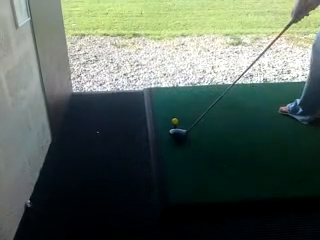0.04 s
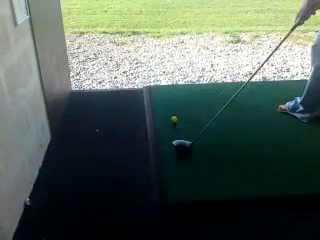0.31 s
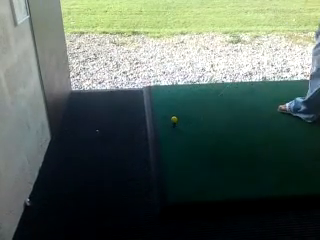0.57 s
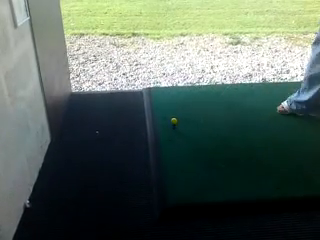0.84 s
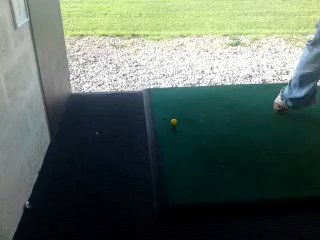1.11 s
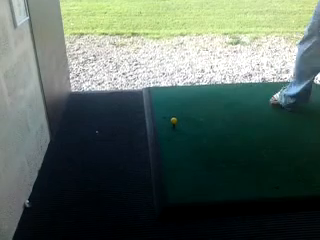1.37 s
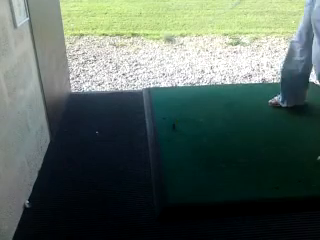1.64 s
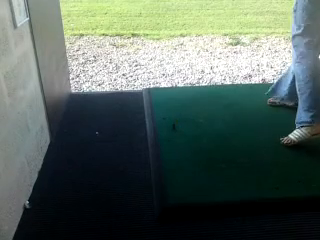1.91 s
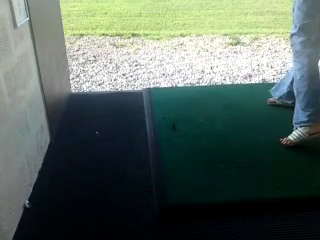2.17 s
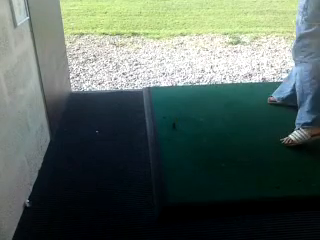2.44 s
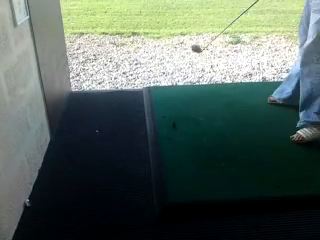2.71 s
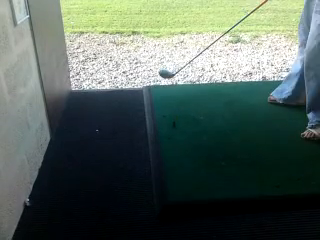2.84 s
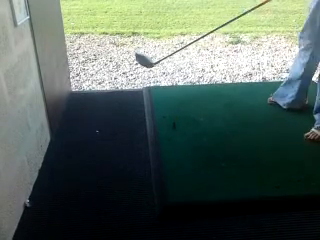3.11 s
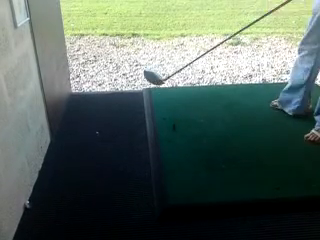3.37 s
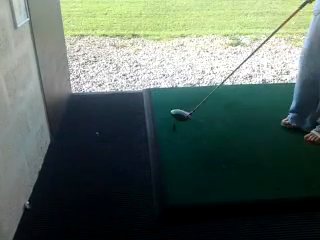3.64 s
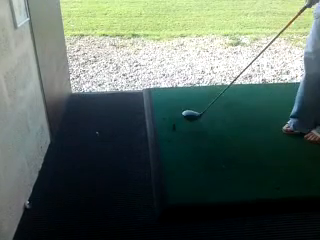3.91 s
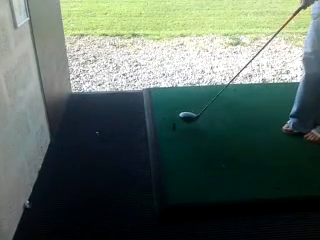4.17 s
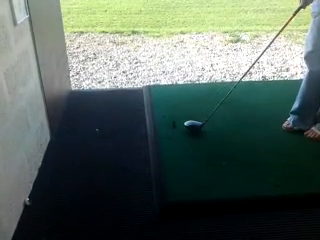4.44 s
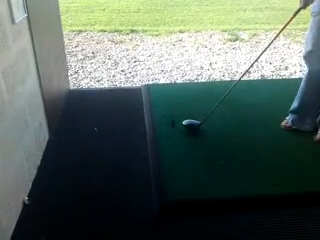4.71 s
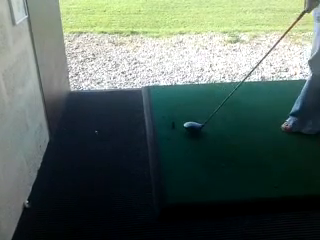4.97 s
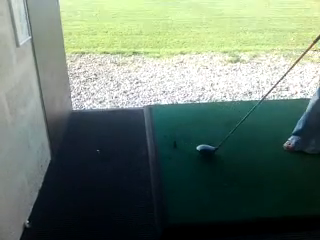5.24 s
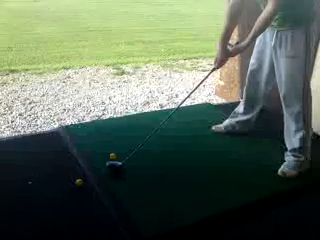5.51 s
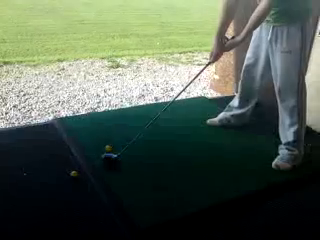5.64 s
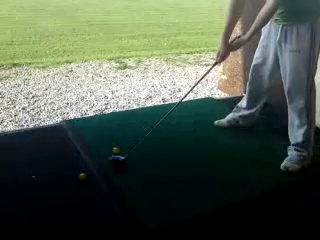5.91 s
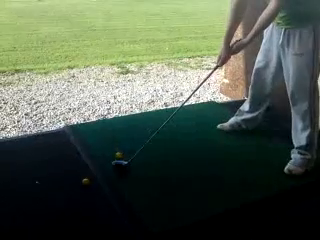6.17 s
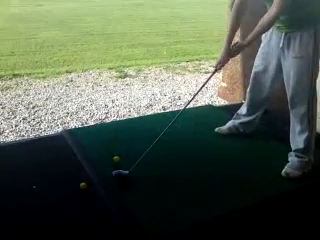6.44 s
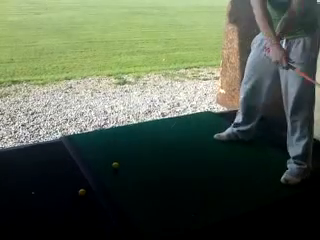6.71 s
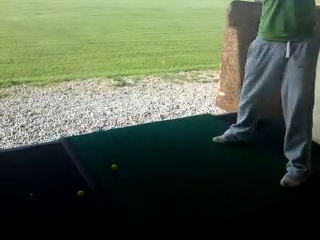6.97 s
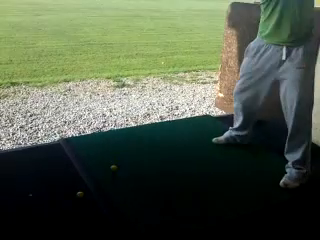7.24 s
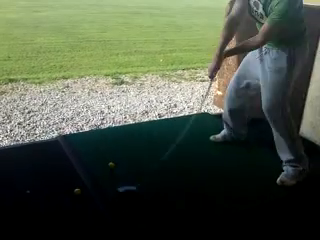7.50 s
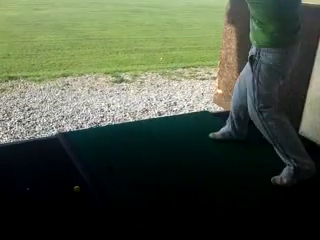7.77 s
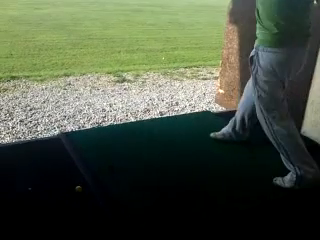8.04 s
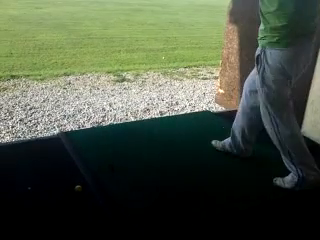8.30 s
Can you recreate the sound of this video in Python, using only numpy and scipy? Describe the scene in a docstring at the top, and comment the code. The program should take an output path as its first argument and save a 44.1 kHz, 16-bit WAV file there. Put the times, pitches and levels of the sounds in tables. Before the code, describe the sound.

Low traffic rumble and soft hiss fill a covered driving-range bay, with faint clothes rustling at 0.4 s. A hard, loud plastic click snaps close to the microphone at 1.0 s. A club whistles down, throbbing, and at 1.3 s hits the ball with a sharp, hollow metallic crack; floor, walls and roof return a short clatter, and a lighter bright slap follows at 1.45 s. Cloth rustles around 2.4-2.7 s as a distant bird calls hoarsely; a songbird's falling whistles follow at 3.3-4.3 s. From 4.1 to 5.3 s fingers rub, click, bump and judder on the camera case, with a sharp click at 4.4 s. The air then changes tone and a low motor hum fades in. Quick bird twitters run 5.4-7.0 s, with a bump at 6.2 s. A lower swish meets a louder crack at 7.07 s, its echo dying away, with one small knock at 7.5 s.

```python
"""In a covered driving-range bay, two drives are hit from a mat: each shaft whistles down as eddies leave it,
then the hollow club head rings and cracks on the ball, and floor, walls and roof throw the crack back. Between
them fingers click, bump, rub and judder on the camera's plastic case, a foot scuffs, and clothes rustle. A
songbird whistles and twitters, a farther bird calls hoarsely over low traffic noise, and later a motor hums.
The camera's look-ahead limiter ducks just before each peak above full scale and recovers slowly."""
import sys
import numpy as np
from scipy import signal
from scipy.fft import rfft, irfft, next_fast_len
from scipy.io import wavfile
from scipy.ndimage import uniform_filter1d, minimum_filter1d, map_coordinates

SR = 44100
rng = np.random.default_rng(int(sys.argv[2]) if len(sys.argv) > 2 else 0)


def dump(signal):
    """Clip the signal to [-1, 1] and save it as 16-bit WAV at the path in sys.argv[1]."""
    limited = np.clip(np.atleast_2d(signal).T, -1, 1)
    pcm = np.round(limited * 32767).astype(np.int16)
    wavfile.write(sys.argv[1], SR, pcm)


N = 367353

# Level of the low traffic noise as it is heard, including set dips that stand for the limiter recovering
# after loud peaks. Each row: time in seconds, level in dB.
LOW_NOISE_LEVEL = [(0, -47), (.9, -48), (1.55, -52.5), (2.1, -49), (4.6, -49), (5.25, -52), (6.2, -47.5),
                   (8.33, -48)]
# Colour of the open air before and after the camera is moved. Each row: frequency in Hz, level in dB per Hz.
AIR_BEFORE_MOVE = [(12, -30), (20, 1), (48, -0.5), (85, -2), (144, -7), (223, -5), (419, -12.5), (954, -13),
                   (1120, -9.5), (1740, -23), (5220, -33), (6320, -30.5), (6860, -34.5), (7450, -32.5),
                   (14000, -36.5)]
AIR_AFTER_MOVE = [(12, -24), (20, 1), (90, -4), (140, -9.5), (278, -12.5), (319, -16.5), (1220, -20),
                  (2060, -27), (2630, -26), (4810, -28), (5510, -29), (6150, -31), (10100, -29.5),
                  (12900, -34), (14000, -39)]
# How alike the two microphone ports hear sound from all around. Each row: frequency in Hz, likeness (1 = same).
PORT_LIKENESS = [(60, 0.42), (180, 0.69), (540, 0.87), (1630, 0.045), (4900, 0.0395), (14700, 0.01)]
# How the open air leans to one side. Each row: frequency in Hz, left minus right in dB.
AIR_LEAN = [(60, -7.5), (110, 0), (200, 0.5), (380, 2.5), (690, 2.5), (1280, -1.5), (2350, 1.0), (4340, 2),
            (7990, 1), (14700, 2.5)]
MOVE_S = 5.2  # when the camera is moved
HISS_DB, MOVED_HISS_DB = -56.5, -62  # middle level of the fine hiss before and after the move
HUM_HZ, HUM_SAG_HZ_PER_S, HUM_DB, HUM_RISE_S = 84.4, 0.798, -52, 0.76  # the motor after the move

# Echo among the trees. Each row: frequency in Hz, time to die by 60 dB in seconds.
TREE_ECHO = [(2000, 1), (8000, 0.18)]
# A farther bird's calls. Each row: start in seconds, length in seconds, first and last pitch in Hz, level in dB.
HOARSE_CALLS = [(2.557, .11, 3760, 3260, -57), (2.829, 0.11, 3650, 3240, -61)]
# The songbird's falling whistles. Each row: start in seconds, length in seconds, pitch before bending in Hz,
# level in dB.
SONG_WHISTLES = [(3.29, .07, 7800, -60), (3.385, .1, 7900, -59.5), (3.569, .13, 7530, -64),
                 (3.799, 0.084, 6460, -61), (3.848, 0.076, 4830, -65), (3.982, .05, 4100, -64),
                 (4.025, 0.043, 2910, -54.5), (4.157, 0.09, 4510, -56.5), (4.259, 0.077, 2880, -54)]
# A whistle starts sharp by this share, settles over these seconds, and loses this share of pitch per second.
SCOOP, SCOOP_S, SAG_PER_S = 0.059, 0.0099, 0.087
# Loud chirps of the twitter. Each row: start in seconds, length in seconds, middle pitch in Hz,
# glide in octaves, level in dB.
LOUD_CHIRPS = [(5.419, 0.066, 5590, 0.29, -54.5), (5.808, 0.05, 4530, 0.23, -57.5),
               (5.88, 0.052, 3780, 0.24, -58.5), (5.946, .042, 4330, .08, -57),
               (6.126, .016, 5240, 0.68, -56), (6.218, 0.037, 4830, -0.053, -54.5),
               (6.263, 0.018, 5580, 0.095, -43), (6.332, 0.028, 5000, 0.027, -48.5),
               (6.356, 0.023, 3410, .29, -54.5), (6.395, .022, 4150, 0.21, -50),
               (6.46, 0.036, 4590, 0.11, -49.5), (6.504, .027, 5830, -0.041, -42.5),
               (6.556, .02, 3840, 0.59, -54.5), (6.615, .04, 4920, 0.44, -62),
               (6.712, 0.052, 5190, 0.57, -57), (6.768, 0.038, 3850, -0.58, -54.5),
               (6.831, 0.043, 4660, -.08, -57), (6.86, 0.037, 3460, -.2, -55.5),
               (6.945, 0.03, 4110, .2, -55)]
# Faint random chirps. The one row: from and to in seconds, lowest and highest pitch in Hz, level in dB.
FAINT_TWITTER = (5.8, 6.9, 3400, 5700, -63)
CHIRP_DROOP = .035  # octaves by which both ends of a chirp droop

# Clothes rustling as the golfers shift. Each row: loudest moment in seconds, half length in seconds, level in dB.
CLOTHES_RUSTLES = [(0.402, 0.27, -59.5), (2.394, .15, -57.5), (2.72, 0.19, -56), (4.422, 0.19, -60),
                   (4.943, .1, -56), (5.996, 0.082, -51), (7.91, 0.1, -57.5)]
# Colour of cloth on cloth. Each row: frequency in Hz, level in dB per Hz.
CLOTH_COLOUR = [(1000, -20), (2500, 1.5), (5000, -2.5), (6500, -0.5), (8000, -3.5), (9800, 2.5),
                (14000, -13)]
# Short rubs on the camera, and a foot scuff. Each row: start in seconds, length in seconds, rasp in dB, # low
# rumble in dB, left minus right in dB.
RUBS_AND_SCUFFS = [(1.855, 0.062, -45.5, -49, 1), (4.13, 0.027, -35, -41, -9.5),
                   (4.162, 0.029, -40, -34.5, -12), (4.667, 0.06, -41, -35, -7), (4.847, 0.042, -42.5, -45, 1),
                   (4.897, 0.1, -47, -40.5, -1), (5.066, 0.14, -65, -43.5, -9), (5.288, 0.031, -55, -37, 11.5)]
# Colours of the rasp and the rumble. Each row: frequency in Hz, level in dB per Hz.
RASP_COLOUR = [(290, 5), (500, -0.5), (1380, -6.5), (1750, -4.5), (4790, -12.5), (5420, -17.5),
               (9880, -8.5), (12800, -16), (14000, -27)]
RUMBLE_COLOUR = [(20, 10.5), (50, 6.5), (150, 3.5), (300, 0), (800, -16), (2000, -39)]

# Resonances of the plastic case. Each row: frequency in Hz, width in Hz, dB before the ring setting is added.
CASE_MODES = [(348, 104, 0.5), (724, 140, -3), (1030, 130, 3.5), (2060, 120, -2), (3070, 320, 2),
              (4170, 240, -4.5)]
# Colours of a soft fingertip, a hard click and a crisp tick. Each row: frequency in Hz, level in dB per Hz.
SOFT_TOUCH_COLOUR = [(40, -46), (200, 0.5), (400, 7), (850, 13), (1600, -2), (2400, -18.5), (5000, -23),
                     (14000, -32)]
CLICK_COLOUR = [(60, -41), (300, -16), (900, -12), (1600, -27), (4000, -24), (6000, -30), (14000, -21)]
TICK_COLOUR = [(500, -7), (2000, 4.5), (5000, 1.5), (10000, 6.0), (14000, 0.0)]
# A finger slips over the case. The one row: last slip in dB, growth in dB per second, middle thump pitch in Hz,
# tick in dB against the slip, left minus right in dB.
FINGER_JUDDER = (-22, 160, 351, -21, -15)
JUDDER_S, SLIP_S = 5.0622, .0153  # start of the judder and time between slips
# When the grip on the camera shifts. The one row: from and to in seconds.
GRIP_SHIFT = (4.45, 4.97)
CREAK_DB, CREAK_SIDE_DB = -33, -11  # loudest possible creak, and left minus right
# Fingers bumping the camera. Each row: start in seconds, knock in dB, thump in dB, thump pitch in Hz,
# crisp tick in dB, left minus right in dB.
FINGER_BUMPS = [(4.166, -30, -21, 300, -32, -7), (4.2398, -28.5, -27.5, 316, -36, -5),
                (4.5595, -31, -29.5, 293, -24.5, -5.5), (4.6704, -36, -30, 140, -32, -7),
                (4.88, -51, -50, 200, -27.5, -11), (4.914, -46, -26, 187, -21.5, 13.5),
                (4.924, -21, -33, 69, -38, -13.5), (4.978, -29, -32, 220, -33, -8),
                (4.995, -19.5, -27.5, 169, -9, -12), (5.1297, -25.5, -11, 222, -19.5, -14),
                (5.1627, -35, -37.5, 260, -46, -15), (6.221, -31.5, -27, 284, -17.5, -7),
                (7.508, -33.5, -35.5, 254, -57, -14)]
# Sharp plastic clicks at the camera. Each row: start in seconds, level in dB, left minus right in dB.
CASE_CLICKS = [(0.9722, -3.8, 5.5), (4.4329, -13, -7)]

# Echo of the bay. Each row: frequency in Hz, time to die by 60 dB in seconds.
BAY_ECHO = [(150, 0.65), (600, 0.59), (1500, 0.49), (3000, 0.58), (5000, 0.41), (9000, 0.35), (14000, 0.26)]
# Colours of the slap and of the air behind the shaft. Each row: frequency in Hz, level in dB per Hz.
SLAP_COLOUR = [(200, -14), (1000, -1), (2500, -5.5), (3400, -7.0), (4300, -2.5), (5900, 5), (7500, -8.5),
               (10000, -9), (14000, -18)]
WAKE_COLOUR = [(35, -32), (80, -5), (200, -2.5), (700, 0.5), (1600, -14.0), (3000, -18.0), (6000, -24.5),
               (14000, -26)]
SLAP_S = 1.438  # a lighter, bright slap follows the first drive
# Downswings. Each row: fastest moment in seconds, seconds before it at half speed, top pitch in Hz, level in dB,
# throb period in seconds, throb depth in dB, octave in dB and hiss in dB against the whistle,
# left minus right in dB.
DOWNSWINGS = [(1.283, .098, 680, -22.5, .034, 6, -18, -7, 3),
              (7.054, .1, 580, -19.5, .0225, 3, -22, -6.5, 2.5)]
FOLLOW_THROUGH_S = .085  # this long after its fastest moment the club is down to half speed
SWING_SHAPE = 2.5  # higher = longer at top speed, with steeper flanks
LOUDNESS_POWER = 5.3  # the whistle's amplitude grows as this power of the speed
# Club on ball. Each row: time in seconds, crack peak in dB before side shading and limiter, floor and near walls
# in dB, time for the walls to die by 60 dB in seconds, roof in dB, side wall delay in seconds,
# side wall in dB against the near walls.
BALL_STRIKES = [(1.2988, 3, -2.5, 0.18, -13, 0.011, -0.5), (7.0712, 7, -2.5, 0.2, -14, 0.016, -1.5)]
# Resonances of the two hollow club heads. Each row: frequency in Hz, width in Hz,
# dB before the ring setting is added.
FIRST_HEAD = [(1170, 140, -5), (1640, 160, -5), (3880, 250, -12), (4830, 140, -1), (5090, 150, 0),
              (6250, 100, -7), (6550, 100, -7), (7040, 180, -10), (8420, 90, -11), (9570, 140, -10),
              (10300, 100, -12)]
SECOND_HEAD = [(1370, 160, -2), (1850, 240, -6), (3800, 180, -15), (4830, 150, -5), (5080, 180, -5),
               (6680, 140, -7), (7050, 190, -7), (8350, 150, -13), (9070, 160, -9), (10350, 150, -13),
               (11500, 150, -15)]
# The broad crack of each contact. Each row: frequency in Hz, level in dB per Hz.
FIRST_CRACK = [(59, -36), (100, -19.5), (471, -7), (617, -4), (933, -3.5), (1200, -5), (2730, -9.5),
               (3230, -16), (3730, -14), (4220, -15), (4980, -8), (5870, -7.5), (9850, -7), (12600, -12.5),
               (14000, -38.5)]
SECOND_CRACK = [(59, -63), (100, -38), (270, -9.5), (400, -10), (502, -10.5), (895, -10), (1410, 1.5),
                (3030, -18), (4220, -17), (4980, -3.5), (6000, -23), (6790, -4.5), (7850, -16), (9650, -10),
                (12500, -20.5), (14000, -24)]
# The left port hears the drives brighter. Each row: frequency in Hz, left minus right in dB.
DRIVE_SHADE = [(200, 0), (1000, 1.5), (2500, 2), (5000, 3), (9000, 2.5), (13000, 5)]
TOP_HZ = 14000  # the sound ends steeply here


def amp(db):
    """Decibels to gain."""
    return 10 ** (np.asarray(db) / 20)


def unit(x):
    """Scale to rms 1."""
    return x / np.sqrt(np.mean(x ** 2) + 1e-20)


def crest(x):
    """Scale to peak 1."""
    return x / np.abs(x).max()


def along(points, hz):
    """Read a curve of (Hz, value) points on a log axis."""
    f, v = np.transpose(points)
    return np.interp(np.log(hz + 1), np.log(f + 1), v)


def curves(rows):
    """One value per sample for each column after the time."""
    s, *cols = np.transpose(rows)
    return [np.interp(np.arange(N) / SR, s, c) for c in cols]


def wobble(rate):
    """A smooth random curve with this many random points a second."""
    points = rng.standard_normal(int(N * rate / SR) + 4)
    return map_coordinates(points, [np.arange(N) * rate / SR])


def fade(t, t60):
    """Exponential decay that starts at t = 0 and falls 60 dB in t60."""
    return (t >= 0) * np.exp(-np.log(1000) * np.abs(t) / t60)


def pan(db):
    """Left and right gains for a level difference."""
    return amp(np.array([[db], [-db]]) / 2)


def add(track, s, x):
    """Mix x into the track at time s, cutting off what runs past the end."""
    part = track[:, round(s * SR):][:, :x.shape[-1]]
    part += x[..., :part.shape[1]]


def filtered(x, response):
    """Shape x by a response that depends on frequency."""
    n = x.shape[-1]
    m = next_fast_len(n + 8192)
    return irfft(rfft(x, m) * response(np.fft.rfftfreq(m, 1 / SR)), m)[..., :n]


def noise(spectrum, size):
    """Two unrelated coloured noises of rms 1."""
    return unit(filtered(rng.standard_normal((2, size)), lambda hz: amp(along(spectrum, hz))))


def struck(modes, spectrum, ring_db, size=8192):
    """Sound of a blow: resonances stand on a broad spectrum, and nothing sounds before the blow."""
    hz = np.fft.rfftfreq(size, 1 / SR)
    power = amp(along(spectrum, hz)) ** 2 + 1e-12
    for centre, width, db in modes:
        damping = (hz * width) ** 2
        power += amp(db + ring_db) ** 2 * damping / ((centre ** 2 - hz ** 2) ** 2 + damping)
    # folding the cepstrum forward packs the energy as early as it can be
    cepstrum = irfft(np.log(power) / 2)
    cepstrum[1:size // 2] *= 2
    cepstrum[size // 2 + 1:] = 0
    return irfft(np.exp(rfft(cepstrum)))[:size // 2]


def tail(decays):
    """Diffuse stereo echo in which each frequency dies at its own speed."""
    hz, t, z = signal.stft(rng.standard_normal((2, SR)), SR, nperseg=256)
    dying = z * fade(t, along(decays, hz)[:, None])
    return signal.istft(dying, SR, nperseg=256)[1][:, :SR]


def echo(x, decays):
    """A mono sound as its surroundings return it."""
    h = tail(decays)
    return signal.fftconvolve(x[None], h / np.linalg.norm(h[0]), axes=1)[:, :N]


def ports(pair):
    """Two unrelated signals become sound from all around at two closely spaced microphone ports."""
    def shares(hz):
        turn = np.arccos(np.clip(along(PORT_LIKENESS, hz), -1, 1)) / 2
        return np.array([np.cos(turn), np.sin(turn)])

    mid, side = filtered(pair, shares)
    return np.array([mid + side, mid - side])


def open_air(split_hz=2000):
    """Low traffic noise follows its level table under a wavering hiss; the colour changes as the camera moves."""
    low_noise_db, = curves(LOW_NOISE_LEVEL)
    moved = np.clip((np.arange(N) / SR - MOVE_S) / 0.029, 0, 1)
    hiss_db = HISS_DB + (MOVED_HISS_DB - HISS_DB) * moved
    air = ports(np.sqrt(1 - moved) * noise(AIR_BEFORE_MOVE, N) + np.sqrt(moved) * noise(AIR_AFTER_MOVE, N))
    air = filtered(air, lambda hz: amp(along(AIR_LEAN, hz) * np.array([[1], [-1]]) / 2))
    low = filtered(air, lambda hz: 1 / (1 + (hz / split_hz) ** 4))
    low_noise = amp(low_noise_db) * unit(low)
    hiss = amp(hiss_db + 1.2 * wobble(2.82)) * unit(air - low)
    return low_noise + hiss


def motor():
    """A far motor's low, unsteady hum fades in after the move and slowly sags in pitch."""
    t = np.maximum(np.arange(N) / SR - MOVE_S, 0)
    pitch_hz = HUM_HZ - HUM_SAG_HZ_PER_S * t + 0.79 * wobble(3.2)
    hum = unit(np.sin(2 * np.pi * np.cumsum(pitch_hz) / SR))
    rise = 1 - np.exp(-t / HUM_RISE_S)
    return pan(-2.5) * amp(HUM_DB + 2.0 * wobble(19)) * rise * hum


def hoarse_bird(rasp=1.4):
    """Falling calls whose unsteady phase smears them into a rasp."""
    calls = np.zeros((1, N))
    for s, length, start_hz, end_hz, db in HOARSE_CALLS:
        u = np.linspace(0, 1, int(length * SR))
        pitch_hz = start_hz + (end_hz - start_hz) * u
        phase = 2 * np.pi * np.cumsum(pitch_hz) / SR + rasp * wobble(599)[:len(u)]
        add(calls, s, amp(db) * unit(np.sin(np.pi * u) * np.sin(phase)))
    return amp(-4.0) * calls + amp(-2.0) * echo(calls[0], TREE_ECHO)


def note(hz, db, quaver, flutter_db):
    """A pure bird note on a pitch path, slightly unsteady in pitch and level."""
    u = np.linspace(0, 1, len(hz))
    knots = np.linspace(0, 1, 14)
    waver, flutter = (np.interp(u, knots, v) for v in rng.standard_normal((2, 14)))
    tone = np.sin(2 * np.pi * np.cumsum(hz * (1 + quaver * waver)) / SR)
    swell = np.abs(np.sin(np.pi * u)) ** .5
    return amp(db) * unit(swell * amp(flutter_db * flutter) * tone)


def songbird(side_db=6, faint_count=7):
    """Whistles step down, then a twitter of quick gliding chirps follows; both echo across the range."""
    song = np.zeros((1, N))
    for s, length, hz, db in SONG_WHISTLES:
        t = np.arange(int(length * SR)) / SR
        bend = 1 + SCOOP * np.exp(-t / SCOOP_S) - SAG_PER_S * t
        add(song, s, note(hz * bend, db, quaver=0.0083, flutter_db=3.0))
    first_s, last_s, low_hz, high_hz, faint_db = FAINT_TWITTER
    chirps = list(LOUD_CHIRPS)
    for k, (when, pitch, glide) in enumerate(rng.random((faint_count, 3))):
        s = first_s + (last_s - first_s) * (k + when) / faint_count  # one in each equal slot
        chirps.append((s, .025, low_hz + (high_hz - low_hz) * pitch, glide / 2, faint_db))
    for s, length, hz, glide, db in chirps:
        u = np.linspace(-.5, .5, int(length * SR))
        octaves = glide * u - CHIRP_DROOP * (2 * u) ** 2
        add(song, s, note(hz * 2 ** octaves, db, quaver=0.019, flutter_db=3.5))
    return pan(side_db) * song + amp(-4) * echo(song[0], TREE_ECHO)


def rustles(grain_db=1.5):
    """Cloth slides on cloth: soft, slightly grainy swells of treble."""
    t = np.arange(N) / SR
    level = sum(amp(db) * np.exp(-((t - s) / half) ** 2) for s, half, db in CLOTHES_RUSTLES)
    return level * amp(grain_db * wobble(90)) * noise(CLOTH_COLOUR, N)


def rubs():
    """Sliding contact: a grainy rasp over a low rumble, swelling fast and trailing off."""
    out = np.zeros((2, N))
    for s, length, rasp_db, rumble_db, side_db in RUBS_AND_SCUFFS:
        n = int(length * SR)
        stroke = np.sin(np.pi * np.linspace(0, 1, n) ** 0.53)
        slips = amp(3.5 * np.interp(np.arange(n), np.linspace(0, n, 40), rng.standard_normal(40)))
        rasp = amp(rasp_db) * unit(slips * noise(RASP_COLOUR, n))
        rumble = amp(rumble_db) * noise(RUMBLE_COLOUR, n)
        add(out, s, pan(side_db) * stroke * (rasp + rumble))
    return out


def judder(count=5):
    """Stick and slip: a finger pressing harder gives nearly even dull touches, each stronger than the last."""
    last_db, growth, hz, tick_db, side_db = FINGER_JUDDER
    levels = last_db - growth * SLIP_S * np.arange(count)[::-1]
    touches = []
    for k, (late, shift) in enumerate(rng.standard_normal((count, 2))):
        s, db = JUDDER_S + (k + .06 * late) * SLIP_S, levels[k]
        touches.append((s, db, db, hz * 2 ** (.15 * shift), db + tick_db, side_db))
    return touches


def creaks(body_db=-18, count=6):
    """The grip shifts: tiny ticks with hardly any body, at random moments."""
    first_s, last_s = GRIP_SHIFT
    touches = []
    for when, weak in rng.random((count, 2)):
        s, dull_db = first_s + (last_s - first_s) * when, CREAK_DB + body_db
        touches.append((s, dull_db, dull_db, 200, CREAK_DB - 8 * weak, CREAK_SIDE_DB))
    return touches


def bumps(port_turn=0.81):
    """Each touch knocks the damped case, flexes it near the ports and leaves a crisp tick."""
    out, t = np.zeros((2, N)), np.arange(SR // 10) / SR
    knock = crest(struck(CASE_MODES, SOFT_TOUCH_COLOUR, ring_db=-10.5, size=2 * len(t)))
    for s, knock_db, thump_db, thump_hz, tick_db, side_db in FINGER_BUMPS + judder() + creaks():
        cycles = t * thump_hz
        # the two ports move out of step, by port_turn radians
        flex = np.sin(2 * np.pi * cycles + port_turn * np.array([[1], [0]]))
        thump = crest(flex * cycles * fade(cycles, 2.4))  # dies within a few cycles
        tick = crest(noise(TICK_COLOUR, len(t)) * fade(t, 0.0082))
        touch = amp(knock_db) * knock + amp(thump_db) * thump + amp(tick_db) * tick
        add(out, s, pan(side_db) * touch)
    return out


def clicks(shadow_hz=1800):
    """A hard, very short contact rings the plastic case; its treble is shaded from the right port."""
    out = np.zeros((2, N))
    click = crest(struck(CASE_MODES, CLICK_COLOUR, ring_db=8.5))
    for s, db, side_db in CASE_CLICKS:
        add(out, s, pan(side_db) * amp(db) * click)
    return filtered(out, lambda hz: 1 / (1 + 1j * hz / shadow_hz * np.array([[0], [1]])))


def slap(db=-18.0, room_db=-15, brush_db=-9):
    """A short bright smack of noise, with a softer brush rising into it, echoes in the bay."""
    t = np.arange(N) / SR - SLAP_S
    blow = fade(t, .05) + amp(brush_db) * fade(-t, .07)
    smack = amp(db) * noise(SLAP_COLOUR, N) * blow
    return smack + amp(room_db) * echo(smack[0], BAY_ECHO)


def swish(swing):
    """Eddies leave the shaft at a pitch that follows its speed and throb; drag adds the octave, turbulence a hiss."""
    s, half_speed_s, top_hz, db, throb_s, throb_db, octave_db, hiss_db, side_db = swing
    t = np.arange(N) / SR - s
    half_s = np.where(t < 0, half_speed_s, FOLLOW_THROUGH_S)
    speed = 1 / (1 + np.abs(t / half_s) ** SWING_SHAPE)  # 1 at the fastest moment
    throb = throb_db * speed * np.cos(2 * np.pi * t / throb_s)
    level = amp(db + throb) * speed ** LOUDNESS_POWER
    phase = 2 * np.pi * np.cumsum(top_hz * speed) / SR

    def eddies(rate):
        return wobble(rate) + 1j * wobble(rate)  # random strength and timing

    whistle = unit(np.real((1 + .55 * eddies(280)) * np.exp(1j * phase)))
    octave = unit(np.real(eddies(600) * np.exp(2j * phase)))
    tone = level * (whistle + amp(octave_db) * octave)
    wake_level = np.abs(uniform_filter1d(level, size=1500))
    hiss = amp(hiss_db) * wake_level * ports(noise(WAKE_COLOUR, N))
    return pan(side_db) * (tone + hiss) + amp(-16.0) * echo(tone, BAY_ECHO)


def drive(strike, head, crack, ring_db, uneven_db, mat_db=6):
    """The ball rings the club head once; the floor answers at once, then walls and roof return a clatter."""
    s, db, walls_db, walls_t60, roof_db, wall_s, wall_db = strike
    t = np.arange(SR) / SR
    blow = struck(head, crack, ring_db)
    floor = amp(mat_db) * fade(t, .018)
    side_wall = amp(wall_db) * fade(t - wall_s, 0.098)
    near = floor + fade(t, walls_t60) + side_wall
    scatter = amp(walls_db) * near * rng.standard_normal((2, SR)) + amp(roof_db) * tail(BAY_ECHO)
    # later echoes arrive in bunches
    clumps = amp(uneven_db * np.clip(t / 0.2, 0, 1) * wobble(173.6)[:SR])
    out = np.zeros((2, N))
    add(out, s, amp(db) * crest(blow))
    add(out, s, signal.fftconvolve(ports(scatter) * clumps, blow[None] / np.linalg.norm(blow), axes=1))
    half = np.array([[.5], [-.5]])
    lead_s = .00009  # the sound reaches the left port first

    def sides(hz):
        return amp(half * along(DRIVE_SHADE, hz)) * np.exp(2j * np.pi * hz * lead_s * half)

    return filtered(out, sides)


def scene():
    """The range, the handled camera and both drives together."""
    background = open_air() + motor() + hoarse_bird() + songbird()
    handling = rustles() + rubs() + bumps() + clicks()
    first = swish(DOWNSWINGS[0]) + drive(BALL_STRIKES[0], FIRST_HEAD, FIRST_CRACK, ring_db=3.5, uneven_db=2.2)
    second = swish(DOWNSWINGS[1]) + drive(BALL_STRIKES[1], SECOND_HEAD, SECOND_CRACK, ring_db=0, uneven_db=1.6)
    return background + handling + slap() + first + second


def record(dry, release_s=0.11):
    """A look-ahead limiter ducks ahead of each peak above full scale and lets go slowly; the band ends steeply."""
    t = np.arange(N) / SR
    ahead = round(.0095 * SR)
    excess_db = np.maximum(20 * np.log10(np.abs(dry).max(0) + 1e-9), 1e-6)
    # the largest excess within the coming stretch
    excess_db = -minimum_filter1d(-excess_db, ahead, origin=-(ahead // 2))
    # jump up at once, then die away over release_s
    duck_db = np.exp(np.maximum.accumulate(np.log(excess_db) + t / release_s) - t / release_s)
    limited = dry * amp(-uniform_filter1d(duck_db, size=40))
    return filtered(limited, lambda hz: 1 / np.sqrt(1 + (hz / TOP_HZ) ** 160))


dry = scene()
out = record(dry)
dump(out)
```